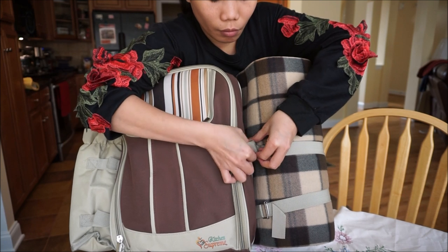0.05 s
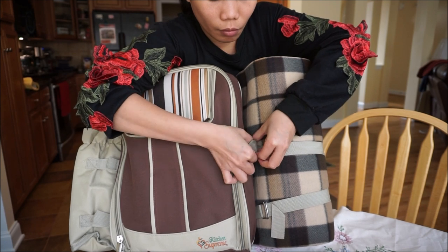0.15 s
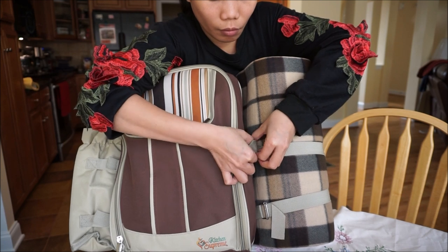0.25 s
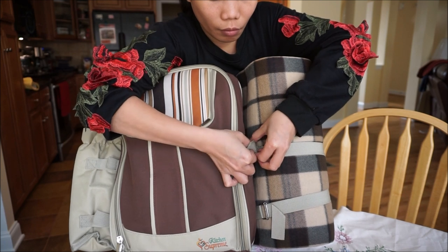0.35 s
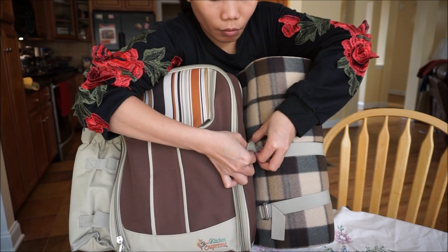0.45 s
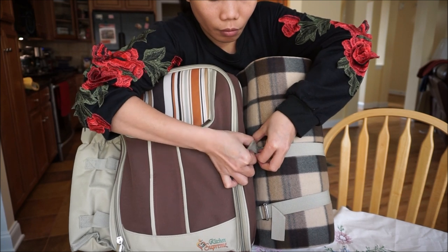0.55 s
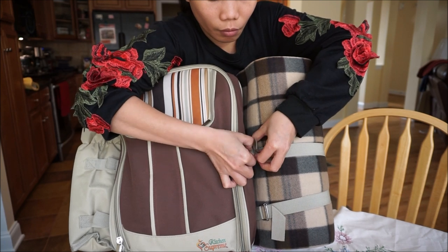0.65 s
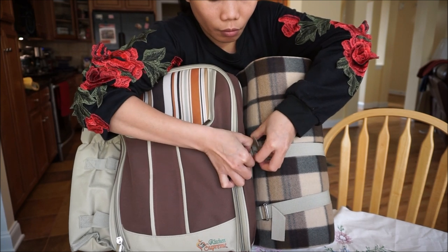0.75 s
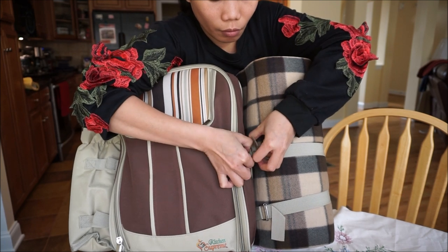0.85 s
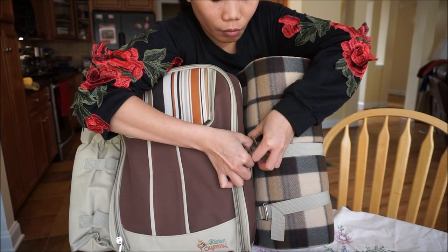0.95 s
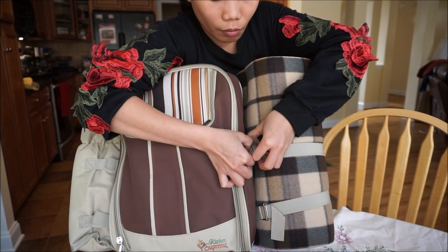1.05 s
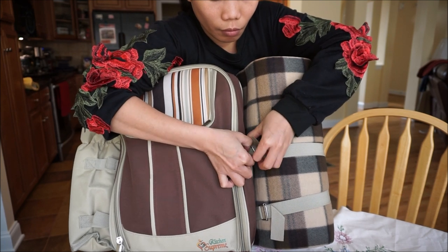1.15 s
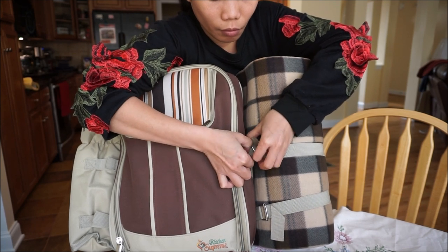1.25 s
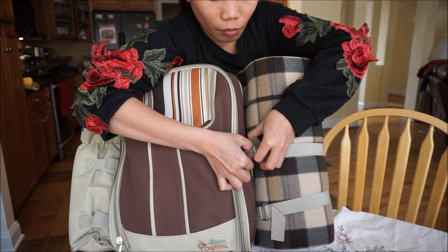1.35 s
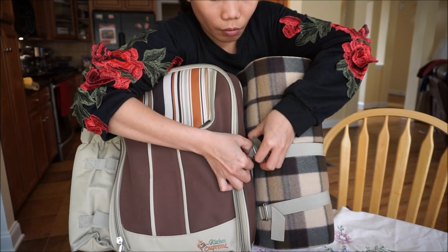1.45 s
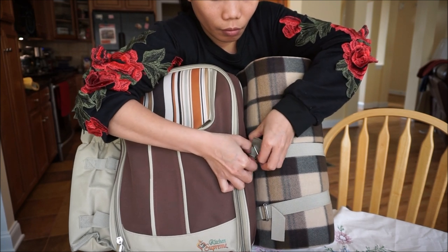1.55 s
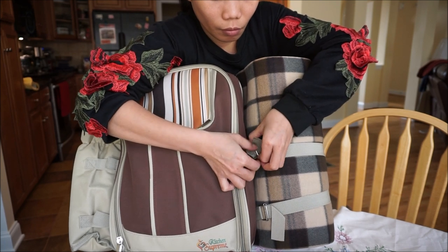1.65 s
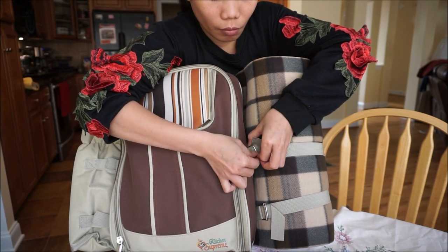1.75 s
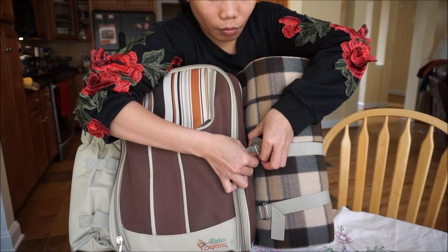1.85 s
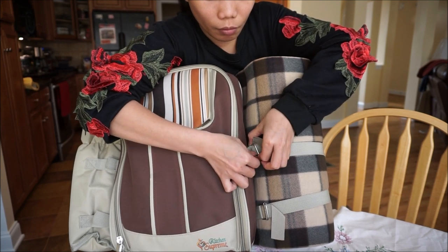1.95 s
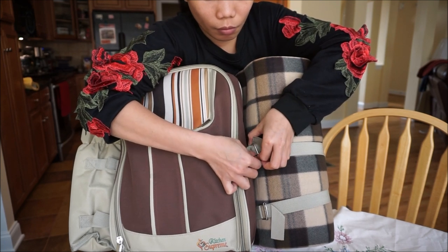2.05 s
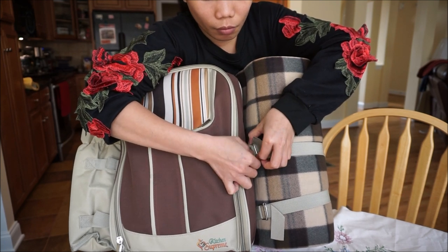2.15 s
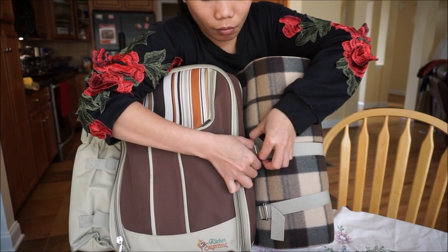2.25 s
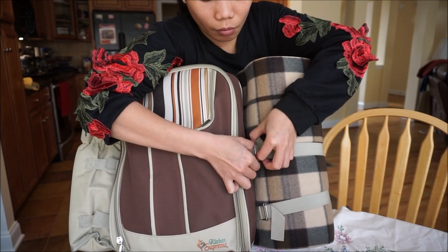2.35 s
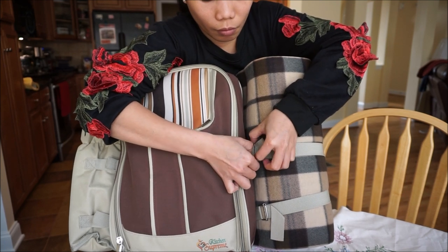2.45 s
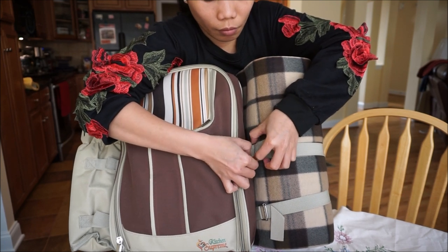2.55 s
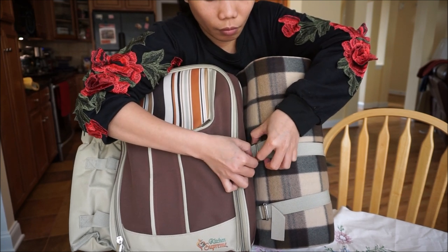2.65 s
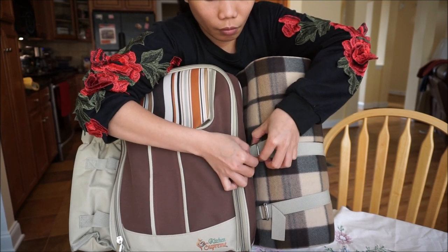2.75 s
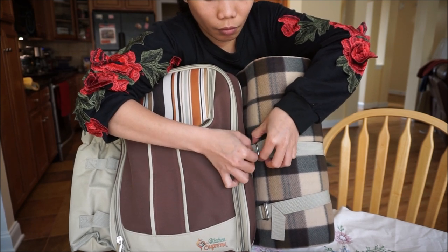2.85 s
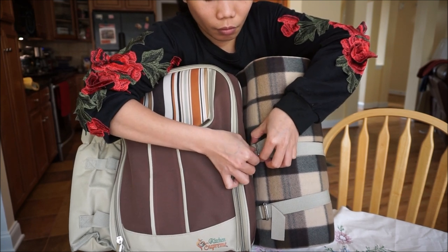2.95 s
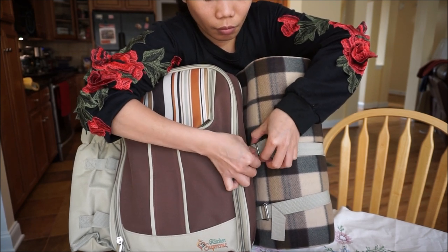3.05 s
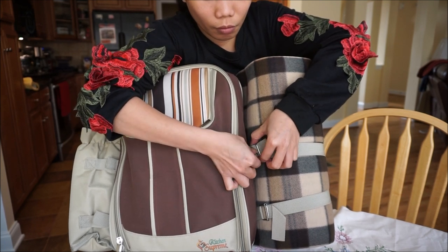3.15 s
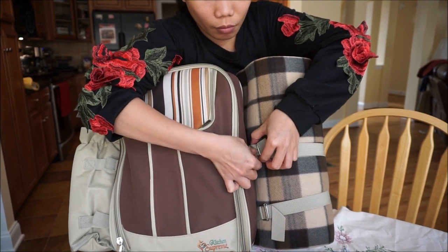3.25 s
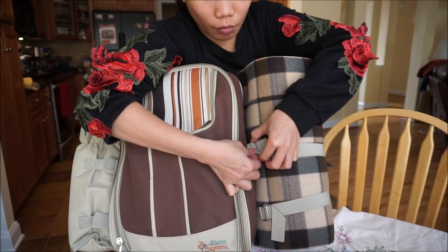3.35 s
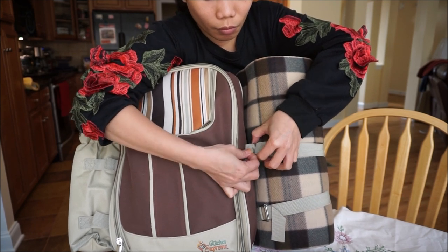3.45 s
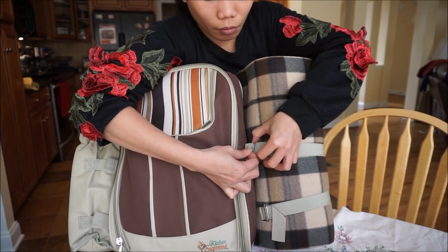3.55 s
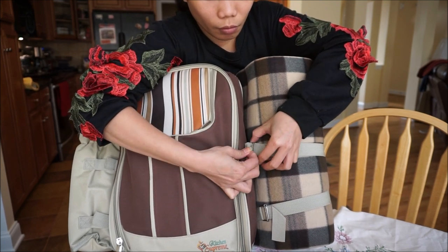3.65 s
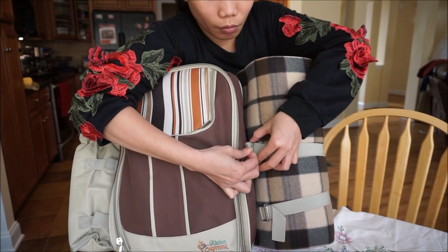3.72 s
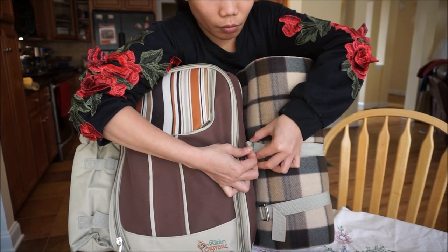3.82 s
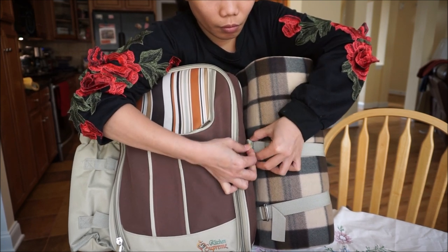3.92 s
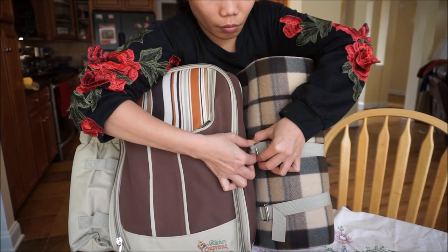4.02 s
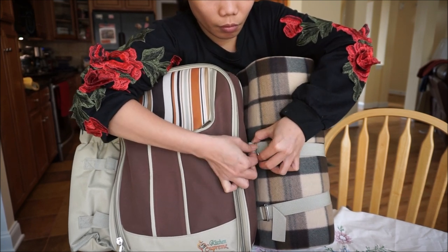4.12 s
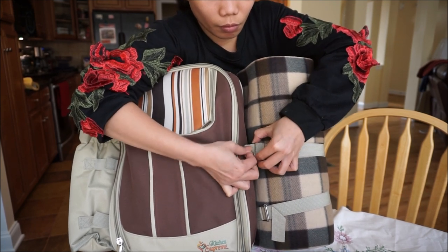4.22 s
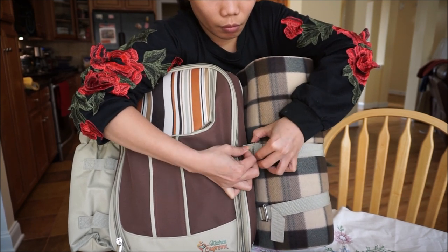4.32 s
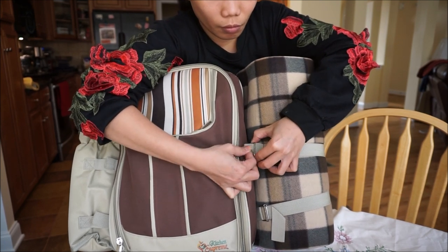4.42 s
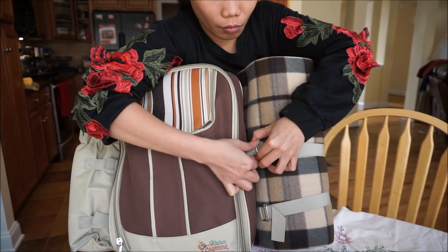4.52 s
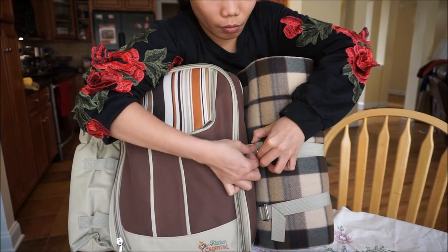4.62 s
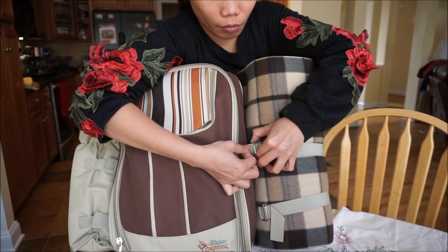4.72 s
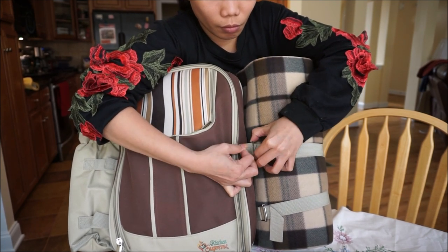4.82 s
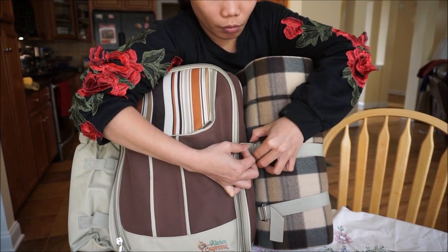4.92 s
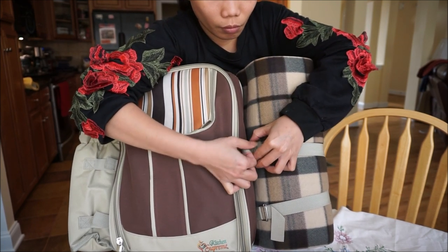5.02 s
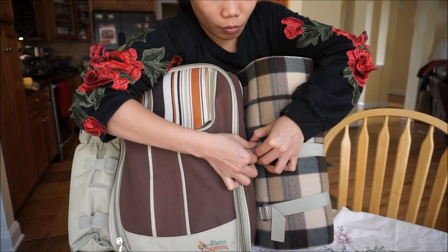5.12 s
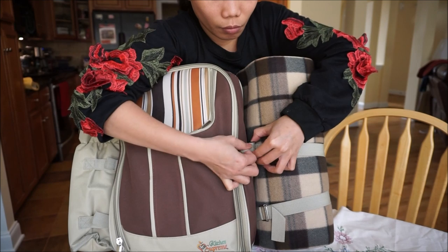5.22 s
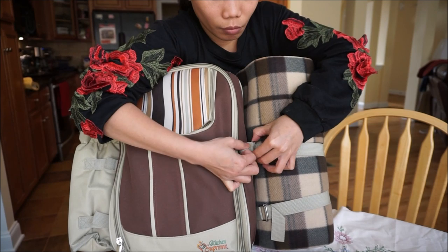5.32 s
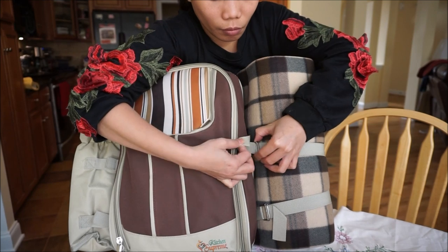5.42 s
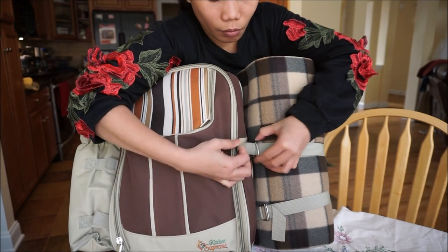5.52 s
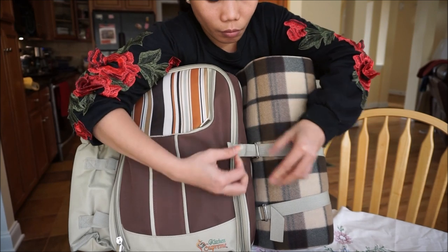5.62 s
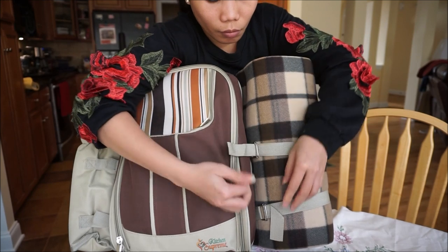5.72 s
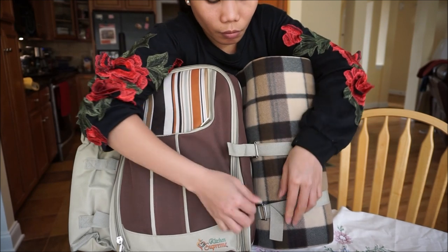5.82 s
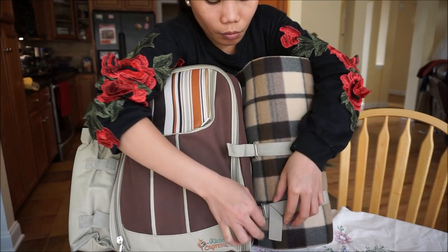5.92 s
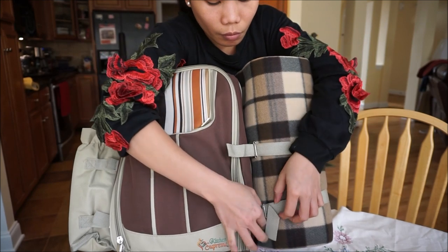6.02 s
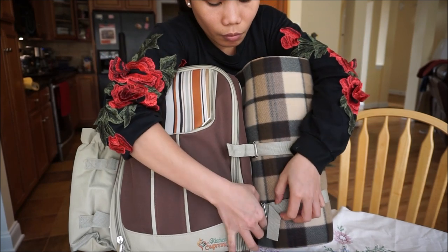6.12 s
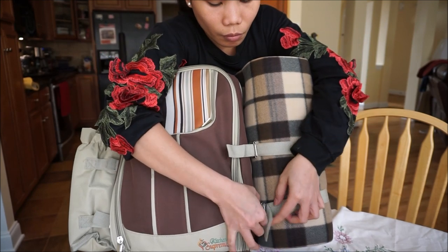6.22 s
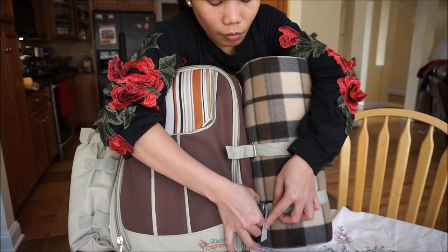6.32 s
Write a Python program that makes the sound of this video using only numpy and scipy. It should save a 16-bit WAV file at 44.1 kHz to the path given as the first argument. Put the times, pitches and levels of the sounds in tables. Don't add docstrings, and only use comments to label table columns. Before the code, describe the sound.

Gentle cloth friction and fingernail taps on plastic begin softly, over still indoor air and a low appliance hum. Past the midpoint, the strap is jerked harder: the buckle cracks and bounces on the stiff bag panel, repeatedly, with dry rattles and short woven scrapes. A loud double snap comes near the end, then brushing fabric and small bright clicks. Close microphones, short room echo.

```python
import sys
import numpy as np
from scipy import signal
from scipy.fft import rfft, irfft
from scipy.io import wavfile
from scipy.ndimage import uniform_filter1d

SR = 44100
rng = np.random.default_rng(int(sys.argv[2]) if len(sys.argv) > 2 else 0)


def field_ratio(decibels):
    return 10 ** (np.asarray(decibels, dtype=float) / 20)


def dump_mix(stems):
    frames = np.atleast_2d(stems).T
    limited = np.clip(frames, -1, 1)
    pcm = np.round(limited * 32767).astype(np.int16)
    wavfile.write(sys.argv[1], SR, pcm)


N = 280917


def evened(x):
    return x / np.sqrt(np.mean(x ** 2) + 1e-20)


def read(points, hz):
    f, value = np.transpose(points)
    return np.interp(np.log(hz + 1), np.log(f + 1), value)


def add(mix, s, sound):
    part = mix[..., round(s * SR):][..., :sound.shape[-1]]
    part += sound[..., :part.shape[-1]]


def passed(x, hz, kind, order=2):
    return signal.sosfilt(signal.butter(order, hz, kind, fs=SR, output="sos"), x)


def pair(common, own, magnitude, side, size):
    overlap = size * 3 // 4
    hz, t, z = signal.stft(np.array([common, own]), SR, nperseg=size, noverlap=overlap)
    apart = field_ratio(read(side, hz))[:, None] * z[1]
    z = np.array([z[0] + apart, z[0] - apart]) * magnitude(hz, t)
    return signal.istft(z, SR, nperseg=size, noverlap=overlap)[1][:, :N]


def ring(modes, t, detune, rise):
    x = 0
    for hz, db, t60 in modes:
        x = x + field_ratio(db - 60 * t / t60) * np.sin(2 * np.pi * hz * detune * t)
    x = x * (1 - np.exp(-t / rise))
    return x / abs(x).max()


def room_air():
    # (frequency [Hz], level [dB per Hz])
    air_colour = [(20, -24), (60, -25), (95, -21), (190, -17), (270, -9), (420, -3), (560, -6),
                  (1400, -13.5), (2200, -19.5), (6000, -21), (16500, -22)]
    # (frequency [Hz], side minus middle [dB])
    air_width = [(60, -2), (180, 1.5), (550, 0), (1650, 8), (4970, 3), (15000, 0.5)]
    common, own = rng.standard_normal((2, N))
    noise = pair(common, own, lambda hz, t: field_ratio(read(air_colour, hz))[:, None], air_width, size=2048)
    return field_ratio(-50.5) * evened(noise)


def appliance_hum():
    # (frequency [Hz], width [Hz], level [dB rms])
    motor_tones = [(59, 6, -90), (118, 3, -77), (241, 3.6, -69), (406.5, 48, -63.5), (450, 36, -63)]
    steady = 0.7
    t = np.arange(N) / SR
    out = np.zeros(N)
    for hz, width, db in motor_tones:
        r = np.exp(-np.pi * width / SR)
        drift = rng.standard_normal(N) + 1j * rng.standard_normal(N)
        for _ in range(2):
            drift = signal.lfilter([1], [1, -r], drift)
        drift = drift / abs(drift) ** steady
        out += field_ratio(db) * evened((drift * np.exp(2j * np.pi * hz * t)).real)
    return out


def slips():
    per_s, spread_db, smooth, flutter_db = 2500, 6.0, 0.88, 1.02
    flurry = field_ratio(flutter_db * evened(uniform_filter1d(rng.standard_normal(N), size=500)))
    strength = field_ratio(spread_db * np.minimum(rng.exponential(1, N), 4))
    happens = rng.random(N) < per_s / SR
    clicks = evened(strength * happens * rng.choice([-1., 1.], N))
    rub = rng.standard_normal((2, N))
    return (np.sqrt(smooth) * rub + np.sqrt(1 - smooth) * clicks) * flurry


def effort(t, trim_db, steps):
    # (peak time [s], build-up
    # [s], fade [s], level [dB], brightness [dB per step])
    hand_strokes = [(.02, 0.22, 0.14, -47, 0.5), (.14, 0.18, 0.2, -53.5, 2), (.38, 0.069, 0.089, -55, 3),
                    (.8, 0.22, 0.16, -52, 2), (1.1, 0.062, 0.091, -50.5, -0.5),
                    (1.375, 0.17, 0.075, -51.5, 2.5), (1.6, 0.069, 0.16, -53, 3.5),
                    (1.856, 0.062, 0.085, -48, 3), (2.35, 0.46, 0.17, -57, 1.5),
                    (2.754, 0.084, 0.21, -53, 5), (3.133, 0.042, 0.11, -53, 1),
                    (3.352, 0.12, 0.11, -48, 3.5), (3.495, 0.057, 0.21, -42.5, -1.5),
                (3.44, 0.047, 0.067, -49.5, 2), (3.72, 0.068, 0.044, -54, -6),
                (3.851, 0.074, 0.28, -44, 2.5), (4.045, 0.034, 0.024, -44, 9), (4.16, 0.089, .2, -47, 7),
                (4.245, 0.11, 0.1, -42.5, 7), (4.33, 0.038, 0.063, -38, 0.5), (4.49, 0.024, .05, -54, 0),
                (4.485, 0.055, 0.13, -46.5, 0), (4.55, 0.11, 0.064, -44, 1.5),
                (4.689, 0.024, 0.035, -35.5, 1.5), (4.77, 0.065, 0.027, -44.5, -3),
                (4.805, 0.041, 0.12, -42.5, 1), (5.001, 0.029, 0.11, -46, 0.2),
                (5.089, 0.02, 0.039, -39, 1.1), (5.228, 0.14, 0.034, -44.5, 2),
                (5.41, 0.026, 0.081, -37, -2), (5.56, .09, .06, -48, 19), (5.63, 0.3, 0.048, -44, 5),
                (5.795, 0.011, 0.077, -68.5, -13), (5.827, 0.021, 0.041, -44, -0.5),
                (5.95, 0.15, 1, -50, 17), (6.035, 0.055, .03, -44.5, 0.5), (6.11, 0.98, 0.57, -52, -2.5)]
    # (time [s], level [dB])
    resting_grip = [(0, -61), (1.5, -59.5), (2.1, -55), (3.1, -59), (3.5, -58), (5.2, -58), (5.75, -59.5),
                    (6.37, -51)]
    s, rise, fade, db, bright = np.transpose(hand_strokes)[:, :, None]
    before = (s - t) / np.maximum(rise, .005)
    after = (t - s) / np.maximum(fade, .005)
    away = np.where(t < s, before, after)
    strokes = field_ratio(db + bright * steps - 10 * away) ** 2
    rest = field_ratio(np.interp(t, *np.transpose(resting_grip))) ** 2
    return field_ratio(trim_db) ** 2 * (strokes.sum(0) + rest)


def rustle():
    # (lowest frequency [Hz], highest frequency [Hz])
    layer_bands = [
        (150, 600),
        (600, 2800),
        (2800, 7000),
        (7000, 19000),
    ]
    # (level [dB], response to brightness [steps])
    layer_shares = [(-2.27, -2.06), (0.22, -0.33), (-3, 0.19), (0.85, 0.37)]
    # (frequency [Hz], level [dB per Hz])
    cloth_colour = [(60, 10), (146, -21.5), (229, -3), (308, -4), (490, -8), (1120, -10), (1400, -8),
                    (3100, -12.5), (4300, -11), (6400, -16), (16500, -17.5)]
    # (frequency [Hz], side minus middle [dB])
    cloth_width = [(60, 4), (180, -23), (550, -3.5), (1650, -4.5), (4970, -1.5), (15000, -3)]

    def magnitude(hz, t):
        colour, power = field_ratio(read(cloth_colour, hz)) ** 2, 0
        for (lo, hi), share in zip(layer_bands, layer_shares):
            band = colour / (1 + (lo / (hz + 1)) ** 8) / (1 + (hz / hi) ** 8)
            power = power + (band / band.mean())[:, None] * effort(t, *share)
        patches = rng.standard_normal((len(hz), len(t)))
        patches = uniform_filter1d(patches, size=9, axis=0)
        patches = evened(uniform_filter1d(patches, size=14, axis=1))
        return np.sqrt(power) * field_ratio(0.5 * patches + 0.1)

    return passed(pair(*slips(), magnitude, cloth_width, size=512), 115, "high", order=4)


def burst(noise, t, hz, kind, rise, t60, spike, shiver_db=-20):
    shiver = field_ratio(shiver_db - 60 * t / 0.12)
    drive = noise * (1 - np.exp(-t / rise)) * (field_ratio(-60 * t / t60) + shiver)
    drive[..., 12] += spike
    x = passed(drive, hz, kind)
    return x / np.sqrt(2 * uniform_filter1d(x[0] ** 2, size=30).max())


def hit(click_db, hz, snap_db, edge_hz):
    t = np.arange(3000) / SR
    noise = rng.standard_normal((2, 2, 3000))
    crack = burst(noise[0], t, (.5 * hz, min(2.2 * hz, 8000)), "band", .0004, .005, spike=2.2)
    snap = burst(noise[1], t, edge_hz, "high", 0.00077, 0.0068, spike=1.6, shiver_db=-29.0)
    mid, apart = field_ratio(click_db) * 0.63 * crack + field_ratio(snap_db) * snap
    plastic = ring([(hz, 0, 6 / hz + 0.0042)], t, 0.94, 0.00009)
    mid = field_ratio(-2.5) * (mid + field_ratio(click_db) * 1.01 * plastic)
    apart = field_ratio(-9.0) * passed(apart, 2000, "high", order=1)
    return np.array([mid + apart, mid - apart])


def nail_ticks():
    # (time [s], peak click [dB], ring [Hz])
    tick_times = [(0.017, -34, 1590), (0.375, -48, 2210), (1.623, -34, 4100), (1.7383, -38.5, 4470),
                  (1.896, -37, 3700), (2.338, -36, 3810), (2.359, -38, 2320), (2.69, -36, 3720),
                  (2.729, -40, 1980), (2.7497, -31.5, 3570), (3.272, -34, 4300), (3.314, -36, 7600),
                  (3.34, -29.5, 3860), (3.358, -28, 10200), (3.4403, -37, 3460), (3.4638, -27.5, 1560),
                  (3.5457, -26.5, 1500), (3.6416, -32, 2720), (3.7923, -34, 2240), (3.8527, -41, 3600),
                  (3.8645, -41, 2600), (4.3288, -23, 1800), (4.66, -31, 5500), (4.6755, -21, 1700),
                  (4.719, -23, 1900), (5.219, -29.5, 1510), (5.377, -35, 6500), (5.4127, -20, 7000),
                  (5.826, -43, 1900), (6.09, -20.5, 5200), (6.0905, -24, 4540), (6.172, -30, 4500)]
    out = np.zeros((2, N))
    for s, db, hz in tick_times:
        add(out, s, hit(db, hz, db - 8, edge_hz=5500))
    return out


def buckle_clicks():
    # (time [s], peak click [dB], ring [Hz], peak bright snap [dB])
    click_times = [(.0273, -35, 2000, -32), (1.0805, -31.5, 4300, -27.5), (1.115, -40, 1480, -31),
                   (1.3558, -30.5, 4700, -26), (1.8258, -39, 6300, -22), (1.8497, -38, 4200, -23.5),
                   (3.4838, -28, 2040, -26), (3.4885, -22, 4430, -28), (3.4925, -17.5, 7060, -25),
                   (3.4932, -24, 2150, -16), (3.4985, -28, 5120, -29), (3.6774, -27, 4300, -21.5),
                   (3.6845, -26.5, 4900, -37), (3.686, -22, 2900, -31), (3.8368, -25, 4200, -25),
                   (4.2425, -15.5, 4080, -21.5), (4.243, -13, 2920, -33), (4.2512, -23, 2800, -24),
                   (4.3278, -21, 5160, -13), (4.336, -24, 4840, -25), (4.675, -22, 3540, -20),
                   (4.6833, -27, 1730, -17), (4.7255, -21, 1710, -25), (4.9925, -30, 1630, -31),
                   (5.0442, -27.5, 4080, -39), (5.1175, -32, 1960, -29), (5.3685, -36, 2170, -22),
                   (5.3697, -19, 4600, -14.5), (5.4025, -15, 2500, -13), (5.4044, -16, 2300, -9.5),
                   (5.4078, -18, 7660, -9.5), (5.9213, -32, 4400, -25), (6.0872, -20.5, 4770, -20)]
    out = np.zeros((2, N))
    for s, db, hz, snap_db in click_times:
        add(out, s, hit(db, hz, snap_db, edge_hz=5500))
    return out


def thread_snaps():
    # (time [s], peak snap [dB])
    snap_times = [(0.391, -27), (.4266, -33), (1.096, -32), (1.293, -36), (1.7378, -32), (1.833, -28),
                  (2.0014, -42), (2.729, -29), (2.7498, -29), (3.359, -33), (3.377, -22), (3.44, -26),
                  (3.446, -24), (3.4655, -20), (3.4906, -6), (3.4985, -13), (3.504, -21), (3.5103, -17),
                  (3.683, -17.5), (4.1515, -18.5), (4.4875, -25), (4.6378, -27), (4.685, -31), (4.897, -40),
                  (5.089, -35), (5.1683, -22), (5.172, -21), (5.219, -35), (5.3562, -29), (5.4038, -9),
                  (5.4125, -17), (5.42, -33), (5.614, -17), (5.633, -23), (5.9693, -19.5)]
    out = np.zeros((2, N))
    for s, db in snap_times:
        add(out, s, hit(db - 13.5, 2500, db, edge_hz=14600))
    return out


def knock(panel_db, bag_db, panel_tune, bag_tune):
    # (frequency [Hz], level [dB], time to fall 60 dB [s])
    panel_tones = [(875, 12, 0.027), (700, 0, 0.077), (992, 8.5, 0.012), (1250, 5, 0.015)]
    # (frequency [Hz], level [dB], time to fall 60 dB [s])
    bag_tones = [(257.8, -3, 0.074), (296.3, -1, 0.068), (431, -1.5, 0.053), (610, -10, 0.064)]
    rattles_per_s, rattle_db, rattle_t60 = 310, -4.5, 0.087
    t = np.arange(6000) / SR
    push = field_ratio(bag_db - 33.5) * ring([(118.4, 0, 0.2)], t, 1, 0.0049)
    panel = field_ratio(panel_db - 5.0) * ring(panel_tones, t, panel_tune, 0.00055)
    bag = field_ratio(bag_db + 0.5) * ring(bag_tones, t, bag_tune, 0.0014)
    happens = rng.random(6000) < rattles_per_s / SR
    strength = rng.uniform(-1, 1, 6000) * field_ratio(rattle_db - 60 * t / rattle_t60)
    chatter = happens * strength * (t > .008)
    struck = panel + field_ratio(-16) * bag
    return panel + bag + signal.fftconvolve(struck, chatter)[:len(t)], push


def bag_knocks():
    # (time [s], panel knock [dB], bag thump [dB], panel pitch [Hz], bag pitch [Hz])
    bounces = [(3.4637, -31, -38, 950, 268), (3.484, -47, -43, 880, 265), (3.4881, -18, -37, 875, 242),
               (3.491, -26, -19, 906, 259), (3.4971, -24, -45, 860, 258), (3.6779, -21, -22.5, 926, 269),
               (3.6817, -48, -22, 900, 263), (3.688, -20, -40, 900, 275), (4.2424, -11, -22.5, 854, 262),
               (4.248, -21, -54, 875, 267), (4.2515, -18, -54, 890, 258), (4.3274, -15, -28, 850, 259),
               (4.3325, -27, -52, 795, 257), (4.334, -23, -40, 770, 225), (4.675, -26, -25, 920, 268),
               (4.686, -38, -31, 880, 254), (4.6832, -12.5, -47, 890, 250), (4.685, -18, -25, 880, 245),
               (4.698, -18.5, -35, 827, 248), (4.7179, -21, -24, 846, 260), (4.7259, -13, -31, 905, 243),
               (5.37, -29, -26, 940, 274), (5.4045, -24, -22.5, 920, 250), (5.4045, -15.5, -26, 930, 255),
               (5.41, -27, -42, 880, 250), (5.4116, -39, -36, 885, 242)]
    # (time [s], panel knock [dB], bag thump [dB])
    finger_pats = [(1.0815, -34, -26), (1.0875, -36, -36), (1.115, -32, -57), (1.3558, -33.5, -39),
                   (1.7378, -46, -47), (1.826, -38, -36.5), (1.8506, -30.5, -40), (1.9, -33, -60),
                   (2.0014, -36.5, -44), (2.7498, -38, -77), (3.395, -33, -34.5), (3.5461, -27, -40),
                   (3.558, -40, -27.5), (3.8362, -28, -31.5), (4.545, -52, -33.5), (4.9945, -27.5, -46),
                   (5.078, -28, -58), (5.089, -40, -38), (5.219, -51, -40), (5.5572, -27, -35),
                   (5.8253, -62, -48), (5.845, -55, -41), (5.9678, -45, -46), (6.04, -36, -36),
                   (6.1731, -37, -41)]
    blows = [(s, p_db, b_db, p_hz / 875, b_hz / 257.8) for s, p_db, b_db, p_hz, b_hz in bounces]
    for row in finger_pats:
        retune = 1 + 0.05 * np.tanh(rng.standard_normal(2))
        blows.append((*row, *retune))
    body, table = np.zeros((2, N)), np.zeros(N)
    for s, *blow in blows:
        sound, push = knock(*blow)
        add(body, s, sound)
        add(table, s, push)
    return body, table


def single_taps():
    # (time [s], peak [dB], ring [Hz], time to fall 60 dB [s])
    tap_times = [(1.0838, -27.5, 380, 0.011), (1.826, -37, 1300, .006), (3.6772, -12, 3700, .002),
                 (3.6776, -9.5, 1250, 0.0045), (3.707, -35, 810, 0.032), (3.7195, -33, 950, .02),
                 (3.8366, -16.5, 2210, 0.0061), (3.8515, -18, 1730, .006), (3.888, -33, 1090, 0.0086),
                 (4.2435, -17, 1520, 0.0024), (4.259, -29, 1050, 0.032), (4.279, -36, 840, .04),
                 (4.3281, -15, 3530, 0.0047), (4.349, -32, 800, 0.035), (4.37, -36, 730, .04),
                 (4.675, -19.5, 353, 0.032), (4.687, -20, 960, .02), (4.701, -23.5, 450, .04),
                 (4.7175, -30, 3620, .01), (4.758, -30.5, 420, .03), (4.782, -33, 439, 0.075),
                 (4.992, -34, 1580, .012), (5.0785, -26.5, 4240, .008), (5.3697, -8.5, 1720, .0035),
                 (5.369, -20, 3470, 0.0046), (5.3775, -22, 4700, .012), (5.4046, -9, 7550, .004),
                 (5.4046, -15, 5440, 0.0033), (5.8256, -36.5, 323, 0.17), (5.4048, -13, 278, 0.059),
                 (4.3284, -20.5, 265.4, 0.057), (4.401, -33, 690, .04), (4.811, -35.5, 442, .09),
                 (3.684, -26.5, 1130, .03), (3.695, -32, 1300, .03), (1.8501, -37, 420, 0.027),
                 (1.356, -39, 400, .03), (1.6226, -36, 4000, .005), (5.9213, -37, 2100, .008),
                 (6.089, -37, 1400, .01), (3.7905, -34.5, 2320, .02), (4.7255, -29, 3630, 0.0049),
                 (4.7257, -24, 1200, 0.0078), (5.37, -17.5, 1040, 0.0074), (5.373, -34, 1550, 0.046),
                 (6.0915, -27, 3700, .01), (6.107, -31, 4400, .01)]
    out, t = np.zeros((2, N)), np.arange(6000) / SR
    for s, db, hz, t60 in tap_times:
        x = field_ratio(db) * ring([(hz, 0, t60)], t, 0.97, 0.09 / hz)
        add(out, s, np.array([x, np.roll(x, shift=2)]))
    return out


def strap_scrapes():
    # (time [s], length [s], ring [Hz], width [Hz], level [dB rms])
    scrape_times = [
        (1.577, 0.054, 3920, 900, -55.5),
        (3.786, .015, 2280, 400, -53),
        (3.827, 0.056, 1900, 1890, -43.5),
        (4.336, 0.12, 700, 393, -48.5),
        (4.986, 0.041, 1700, 1180, -44.5),
        (5.074, 0.049, 1560, 875, -40.5),
        (6.087, 0.019, 4320, 2500, -40),
    ]
    out = np.zeros((2, N))
    for s, length, hz, width, db in scrape_times:
        u = np.arange(0, 1, 1 / (length * SR))
        catches = rng.standard_normal((2, 8000)) ** 3
        mid, apart = passed(catches, (hz - width / 2, hz + width / 2), "band")[:, :len(u)]
        pull = field_ratio(db) * 2 * np.sqrt(u) * (1 - u) * 2 / np.std(mid)
        add(out, s, pull * np.array([mid + 0.44 * apart, mid - 0.087 * apart]))
    return out


def room(x):
    # (delay [s], level [dB])
    near_echoes = [(.009, -13), (0.0113, -11.5), (0.014, -40), (.021, -17.5)]
    # (frequency [Hz], time to fall 60 dB [s])
    room_decay = [(150, 0.46), (400, 0.86), (1000, 0.62), (3000, 0.41), (8000, 0.25), (16000, 0.5)]
    half = SR // 2
    sparse, near = np.zeros((2, 2, half))
    at = np.arange(400, half - 20, 20) + rng.integers(0, 20, (2, (half - 401) // 20))
    np.put_along_axis(sparse, at, rng.choice([-1., 1.], at.shape), 1)
    hz, t, z = signal.stft(sparse, SR, nperseg=256)
    z = z * field_ratio(-60 * t / read(room_decay, hz)[:, None])
    tail = signal.istft(z, SR, nperseg=256)[1][:, :half]
    for s, db in near_echoes:
        near[[0, 1], round(s * SR) + rng.integers(-9, 9, 2)] = field_ratio(db)
    tail = field_ratio(-8.5) * passed(tail, 310, "high", order=1) / np.linalg.norm(tail[0])
    answer = tail + passed(near, 1330, "high")
    wet = signal.fftconvolve(x[None], answer, axes=1)[:, :N]
    apart = passed(wet[0] - wet[1], 1600, "high", order=1) / 2
    return wet.mean(0) + np.array([apart, -apart])


def scene():
    bed = room_air() + appliance_hum() + rustle()
    body, table = bag_knocks()
    buckle = nail_ticks() + buckle_clicks() + thread_snaps() + body + single_taps() + strap_scrapes()
    buckle = 0.044 * buckle + passed(buckle, 210, "high", order=3)
    return buckle + table + room(buckle.mean(0)) + bed


def roll_off(x):
    return signal.sosfilt(signal.butter(12, 16970, fs=SR, output="sos"), x)


def record(dry):
    # (frequency [Hz], left minus right [dB])
    balance = [(60, -1.5), (300, -1), (1000, -0.5), (2500, -1.3), (5000, -2), (12000, 2)]
    hz = np.fft.rfftfreq(N, 1 / SR)
    gain = field_ratio(np.outer([.5, -.5], read(balance, hz))) * (hz < 15770)
    mix = irfft(rfft(dry, axis=1) * gain, N, axis=1)
    return roll_off(mix)


dry = scene()
out = record(dry)
dump_mix(out)
```